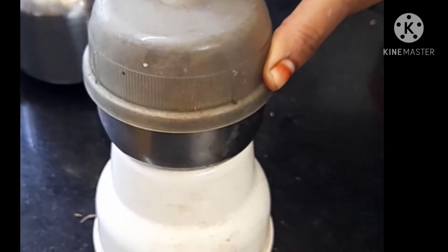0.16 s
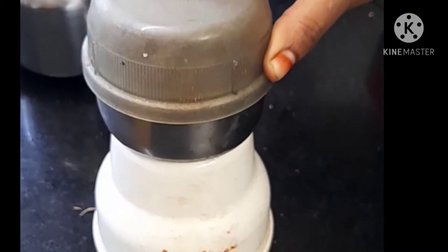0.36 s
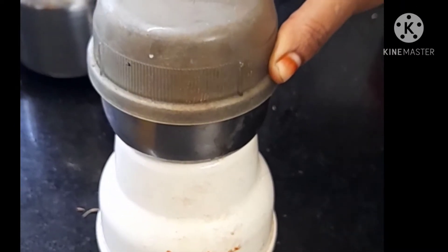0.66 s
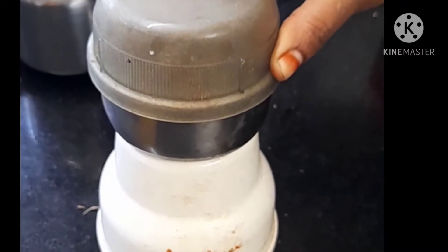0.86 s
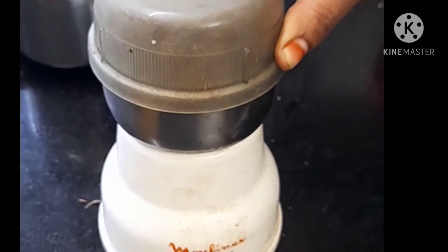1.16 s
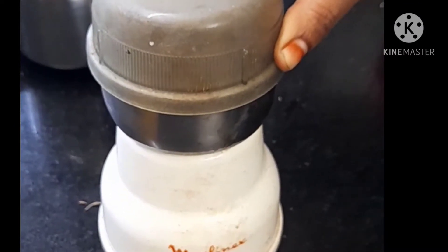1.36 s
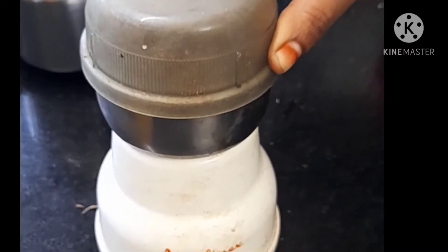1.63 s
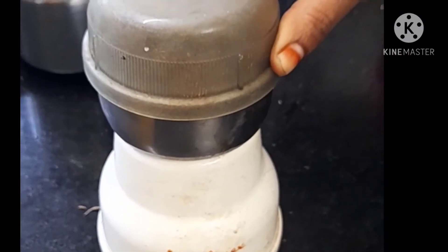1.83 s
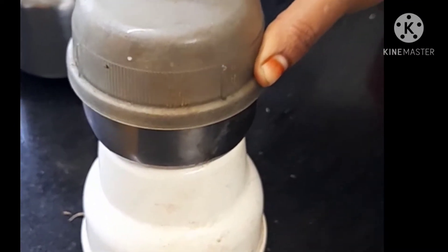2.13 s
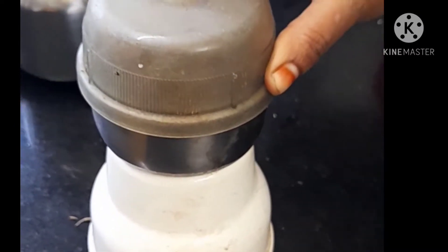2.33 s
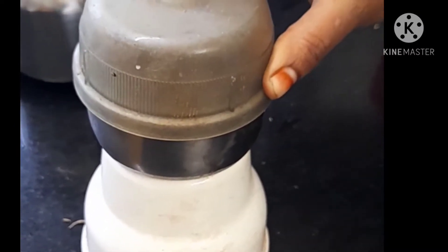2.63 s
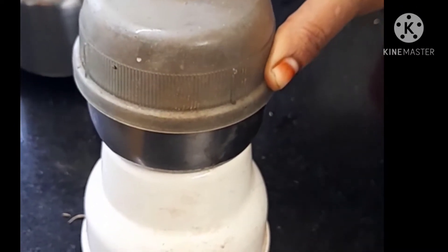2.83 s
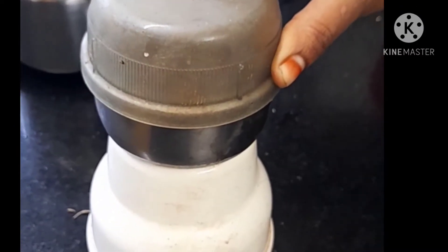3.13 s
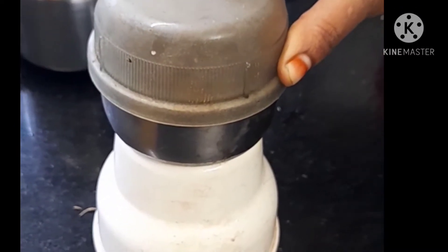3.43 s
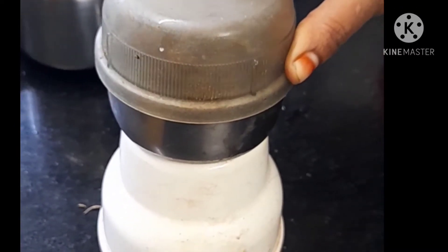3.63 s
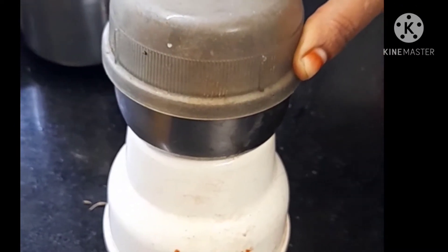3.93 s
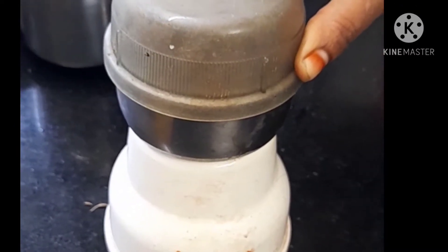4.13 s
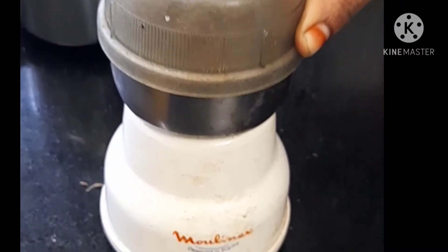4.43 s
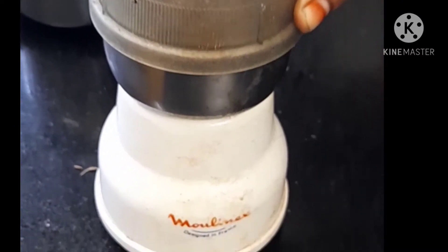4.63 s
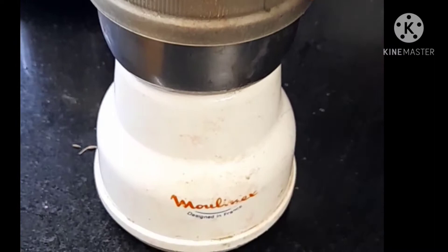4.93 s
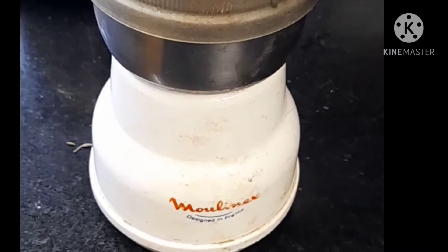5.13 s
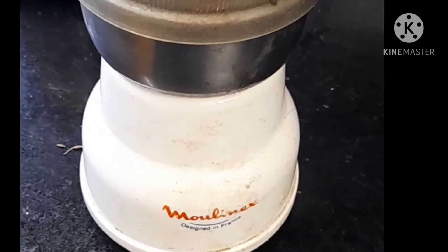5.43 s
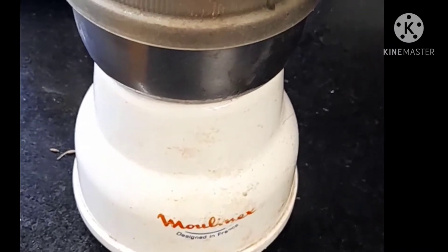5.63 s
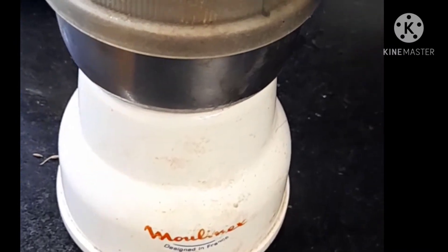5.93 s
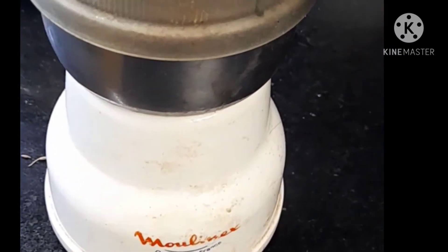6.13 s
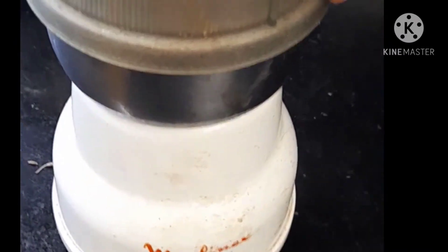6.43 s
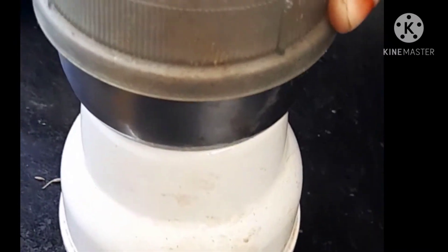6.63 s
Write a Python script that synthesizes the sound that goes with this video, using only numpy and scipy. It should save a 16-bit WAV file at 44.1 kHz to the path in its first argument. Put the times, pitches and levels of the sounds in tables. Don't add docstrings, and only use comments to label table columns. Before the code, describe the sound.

A small electric blade grinder runs very close to a stereo phone microphone on a kitchen counter. At 0 s it is already turning and climbs within about half a second to a steady whine, near 340 Hz with buzzing higher harmonics. Over it lies a rough, airy rush of blades through seeds, a hollow ring around 1 kHz and a bright, crackly hiss of fragments. Whole seeds knock irregularly on the cup, notably near 1.1, 2.0, 2.2 and 4.6 s. At about 2.3 s the switch is released; the whine slides down and the grinding thins by 2.8 s. At 2.9 s it revs again and grinds steadily, slightly higher, until 6.1 s, then coasts downward, the noise fading while loose pieces still rattle until the cut near 6.8 s. Low, dull air thumps hit mostly the left side throughout.

```python
import sys
import numpy as np
from scipy import signal
from scipy.fft import rfft, irfft, next_fast_len
from scipy.io import wavfile
from scipy.ndimage import uniform_filter1d, minimum_filter1d

SR = 44100
rng = np.random.default_rng(int(sys.argv[2]) if len(sys.argv) > 2 else 0)


def generate_wav(sig):
    pcm = np.round(np.clip(np.atleast_2d(sig).T, -1, 1) * 32767).astype(np.int16)
    wavfile.write(sys.argv[1], SR, pcm)


def level_to_linear(level):
    exponent = np.asarray(level, float) / 20
    return 10 ** exponent


N = 298983
SECONDS = np.arange(N) / SR
FFT_SIZE = next_fast_len(N)

# time in seconds, peak in dB.
PUFFS = [(0.075, -19), (0.103, -18), (0.228, -14), (0.292, -16.5), (0.52, -19), (0.58, -26), (0.701, -18.5),
         (1.054, -19), (1.084, -10), (1.421, -20.5), (1.762, -18.5), (2.476, -27), (2.51, -19),
         (3.394, -23), (3.734, -19), (3.826, -17.5), (3.906, -19), (4.21, -19), (4.362, -19.5),
         (4.434, -23), (4.583, -15.5), (4.661, -17.5), (4.853, -18), (5.267, -17), (5.544, -18),
         (5.704, -25), (5.84, -26), (5.938, -15), (6.064, -24), (6.421, -17.5),
         (0.005, -29), (0.743, -25), (0.886, -29), (0.999, -31), (1.278, -31), (1.482, -29),
            (1.524, -27), (1.785, -26), (1.903, -28), (2.105, -30), (2.187, -28), (2.641, -32),
            (2.369, -25), (3.277, -26), (3.637, -27), (3.76, -29), (3.866, -26), (3.983, -27), (4.131, -28),
            (5.065, -31), (5.164, -25), (5.228, -28), (5.344, -29), (5.455, -30), (5.509, -18.5),
            (6.131, -31), (6.16, -27), (6.265, -28), (6.37, -27), (6.633, -26)]

# time in seconds, peak in dB.
KNOCKS = [(0.1012, -16.5), (0.5035, -27), (0.617, -18), (0.9802, -30), (1.0775, -14), (1.2356, -18),
          (1.2815, -40), (1.411, -21), (1.5015, -20), (2.0282, -12.5), (2.173, -10), (2.5913, -16),
          (2.6393, -17.5), (2.75, -21), (2.9896, -16.5), (3.0164, -19), (3.3931, -13.5), (3.5527, -25),
          (3.7651, -32), (4.403, -18), (4.4834, -21), (4.582, -9.5), (4.8214, -19), (5.1971, -14.5),
          (5.5069, -14.5), (5.808, -24), (6.2077, -20), (6.3707, -15.5), (6.4435, -18.5), (6.621, -17)]
# pitch in Hz, width in Hz, level in dB.
CUP_WALL = [(1010, 180, -12), (2050, 260, -33), (3300, 740, -8), (5660, 1500, -25), (10170, 3400, -0.5),
            (14300, 1800, 1)]
BOUNCE_S, BOUNCE_DB = 0.015, -6.5

# frequency in Hz, level in dB.
RUSH = [(120, -90), (250, -9), (400, -11), (490, -13.5), (620, -56), (800, -1.5), (1350, -2), (2000, 2.5),
        (2500, -1), (3000, 1), (3700, -3), (4500, -14.5)]
# frequency in Hz, level in dB.
CUP_AIR = [(450, -16.5), (600, -12.5), (700, -12.5), (820, -9.5), (920, -0.5), (1010, -6.5), (1120, 0),
           (1200, -2.5), (1290, -25), (1420, -5.5), (1600, -25.5)]
# frequency in Hz, level in dB.
GRIT = [(2800, -22), (3600, -4), (4300, -0.5), (6300, 2), (7200, -1.5), (8200, -11), (9200, -34)]
# frequency in Hz, level in dB.
FIZZ = [(7300, -21), (8800, -7.5), (10200, -4), (11500, -2), (12600, -2.5), (13300, -1.5), (14200, -47)]
# frequency in Hz, level in dB.
SIZZLE = [(13100, -22), (13400, -4), (13600, 1), (13900, -2), (14300, -2), (14650, 0), (15000, -3),
          (15500, -2)]
# frequency in Hz, likeness from 0 to 1.
LIKENESS = [(200, .3), (400, 0.35), (1200, 0.19), (2400, 0.05), (4000, 0.02)]
# frequency in Hz, left over right in dB.
LEAN = [(200, 6), (500, 1.5), (1100, -0.5), (2200, -3), (4000, 0), (8000, -1), (11000, 2.5), (14000, -5.5)]
# time in seconds, bite of the blade in dB, whirl of fragments in dB.
CHURN = [(0.0, 0.5, -1.5), (0.13, -5, 3), (0.22, -5.5, 1), (0.5, 0.8, 0.9), (1.05, -1, 1.2), (1.55, -2, -1),
         (2.05, 0.9, 1.5), (2.45, -0.5, 4), (2.75, -8.5, -1.5), (2.84, -17, -3), (2.93, -5, 1),
         (3.3, -2, 1), (4.05, 3, -2), (4.6, -0.5, 0), (5.06, 1.5, 1), (6.1, 1, -1), (6.42, -8.5, -1),
         (6.7, -19, -5.5)]
# time in seconds, swell in dB.
SURGES = [(0.11, 1), (0.65, 4), (0.74, 2.5), (0.86, 4), (1.079, 6.5), (1.27, 0.5), (1.5, 0.5), (1.69, 3.5),
          (1.875, 3.5), (1.905, -0.5), (2.015, 3), (2.045, 5), (2.105, 1), (2.45, 2.5), (2.68, 4),
          (2.755, 8.5), (3.41, 0), (3.77, 5), (4.05, 4), (4.62, 3), (4.7, 5), (5.2, -2), (5.8, 4.5),
          (6.37, 1.5), (6.45, 3), (6.52, 2), (6.63, 8.5)]
SURGE_RISE_S, SURGE_FALL_S = 0.004, 0.028
# base in dB, share of bite, share of whirl, share of surges,
# dB per decade of speed, dB per second as the seeds wear down.
LAYERS = [
    (-34.5, 0.87, 0.086, 0.89, 1.8, 0.17),
    (-32.5, 0.11, 0.66, 1, 2.5, 0.16),
    (-36, 0.53, 0.38, 0.36, -14, -0.42),
]

# start in seconds, end in seconds, drag of the seeds afterwards in Hz.
POWER_ON = [
    (0, 2.325, 340.3),
    (2.89, 6.135, 263.3),
]
RIPPLE_HZ, RIPPLE_DB = 100, -2
START_HZ, SPIN_UP_S = 183.57, 0.15
COAST_S = 1.3
FULL_HZ = 343
# time in seconds, free speed in Hz, unbalance in dB,
# blade beat (order 3) in dB, cup shake (order 4) in dB.
LOAD = [(0.22, 335.7, -5, -36.5, -54), (0.5, 335.9, 2.5, -35.5, -53), (1.24, 343.1, -1.5, -30, -42),
        (1.56, 343.7, -1, -30.5, -52), (2.26, 342, -1.5, -32, -41.5), (2.76, 339, 7, -42, -49),
        (3.15, 337, -2.5, -30.5, -54), (3.185, 337.6, 5, -34.5, -48), (3.45, 340.1, 3.3, -36.5, -57),
        (4.0, 341, -3, -30.5, -45), (4.2, 344.3, -0.5, -26, -49.5), (4.8, 345.4, 0.5, -30, -42),
        (5.0, 345.2, 2.5, -30.5, -35), (5.25, 347.7, -0.6, -37.5, -36.5), (5.95, 346.6, -0.3, -38, -36.5),
        (6.1, 347.2, -3.5, -38, -45), (6.18, 345.3, 4.5, -31, -34), (6.28, 350.3, 2.5, -37, -38)]
# shaft speed in Hz, order 1 in dB.
HOUSING = [(105, -62), (128, -70.5), (152, -42.5), (180, -51.5), (255, -40), (298, -34), (325, -33),
           (345, -28)]
# order, left over right in dB, lead of the left in radians.
MAIN_ORDERS = [(1, -3.5, 0.77), (2, -2.5, 0.75), (3, -4, 0.073), (4, -4, 1.14), (6, -8, 1.76)]
# order, level over order 6 in dB, left over right in dB,
# lead of the left in radians.
WEAK_ORDERS = [(5, -1.5, 2.5, 5), (7, 2, -2, 2.5), (8, -7.5, 3.5, 2.1), (9, -5.5, -13, 3.5)]
# order, lower line in dB, upper line in dB,
# left over right of the upper line in dB.
SIDE_LINES = [(1, -93, -61.5, 24.5), (2, -49.5, -77, 15), (3, -45.5, -36, -8), (4, -41, -46.5, -14.5),
              (5, -67, -70, 7), (6, -47, -57, 7), (7, -49, -50.5, -14), (8, -46, -58.5, -19),
              (9, -41, -50.5, 8)]
OCTAVE_DB, OCTAVE_FOLLOWS = -43, 0.92
SIXTH_DB, SIXTH_FOLLOWS = -42.5, 0.75
SIXTH_COASTING_DB = -4
GRIP_HZ, FADE_DB_PER_DECADE = 307, 106
ROCK_HZ, ROCK_WIDTH_HZ, ROCK_DB = 157.8, 5.8, 10.5

LOW_CUT_HZ = 74
# frequency in Hz, sag below the usual share in dB.
SPARSE = [(1500, -14), (2600, -6), (3500, -3), (4800, -3), (5800, -6), (7300, -3.4), (9400, -3),
          (10500, -4.5), (13000, -6)]
# frequency in Hz, gain in dB.
TOP_EDGE = [(15430, 0), (15500, -24), (15820, -30), (15870, -60)]


def rms_one(x):
    return x / np.sqrt(np.mean(x ** 2) + 1e-20)


def in_time(rows):
    s, *columns = np.transpose(rows)
    return [np.interp(SECONDS, s, c) for c in columns]


def at_hz(points):
    hz, value = np.transpose(points)
    bins_hz = np.arange(1, FFT_SIZE // 2 + 2) * SR / FFT_SIZE
    return np.interp(np.log(bins_hz), np.log(hz), value)


def drift(rate):
    r = np.exp(-80 * np.pi * rate / SR)
    slow = signal.lfilter([1], [1, -2 * r, r * r], rng.standard_normal(N // 40 + 2002))[2000:]
    return np.interp(np.arange(N) / 40, np.arange(len(slow)), rms_one(slow))


def resonate(x, hz, width_hz):
    r = np.exp(-np.pi * width_hz / SR)
    poles = [1, -2 * r * np.cos(2 * np.pi * hz / SR), r * r]
    return signal.lfilter((1 - r * r) / 2 * np.array([1, 0, -1]), poles, x)


def powered():
    held = sum((SECONDS >= on) & (SECONDS < off) for on, off, _ in POWER_ON)
    return uniform_filter1d(held.astype(float), size=600)


def shaft_hz():
    free_hz, speed, now_hz = in_time(LOAD)[0], np.zeros(N), START_HZ
    r = np.exp(-1 / (SPIN_UP_S * SR))
    ends = [on for on, *_ in POWER_ON[1:]] + [N / SR]
    for (on, off, drag_hz), end in zip(POWER_ON, ends):
        a, b, c = int(on * SR), int(off * SR), round(end * SR)
        speed[a:b] = signal.lfilter([1 - r], [1, -r], free_hz[a:b], zi=[r * now_hz])[0]
        coasting = np.exp(-np.arange(c - b) / SR / COAST_S)
        speed[b:c] = (speed[b - 1] + drag_hz) * coasting - drag_hz
        now_hz = speed[c - 1]
    return uniform_filter1d(np.maximum(speed, 60), size=400)


def vent_air():
    t = np.arange(2000) / SR
    s, peak_db = np.transpose(PUFFS)
    steep = np.clip((peak_db + 19) / 30, 0, 1)
    puffs = 0
    for rise_s, share in [(0.0018, 1 - steep), (0.000057, steep)]:
        front = 1 - np.exp(-t / rise_s) * (1 + t / rise_s)
        shape = -front * np.exp(-(t / 0.0098) ** 2)
        starts = np.zeros(N)
        starts[((s - rise_s) * SR).astype(int)] = share * level_to_linear(peak_db + 16)
        puffs = puffs + signal.fftconvolve(starts, shape)[:N]
    low_pass = signal.butter(2, 90, fs=SR, output="sos")
    draught = rms_one(signal.sosfilt(low_pass, rng.standard_normal((2, N))))
    draught *= level_to_linear(1.4 * drift(12.0)) * level_to_linear([[-40], [-60]])
    draught *= (shaft_hz() / FULL_HZ) ** 1.2
    return puffs * level_to_linear([[0], [-25]]) + draught


def knocks():
    s, peak_db = np.transpose(KNOCKS)
    colour_db = rng.normal(0, 4.3, (len(s), len(CUP_WALL)))
    crack, scatter = np.exp(-1 / (0.002 * SR)), np.exp(-1 / (0.014 * SR))
    out = np.zeros((2, N))
    for (hz, width_hz, level_db), own_db in zip(CUP_WALL, colour_db.T):
        hits = np.zeros(N)
        hits[(s * SR).astype(int)] = level_to_linear(peak_db + level_db + own_db - 3.5)
        hits[((s + BOUNCE_S) * SR).astype(int)] = level_to_linear(peak_db + level_db - own_db - 2.5 + BOUNCE_DB)
        hits += 1e-18
        shape = signal.lfilter([1], [1, -crack], hits)
        shape += 0.96 * signal.lfilter([1], [1, -scatter], hits)
        splinters = np.clip(rng.standard_normal((2, N)), -1.6, 1.6)
        out += resonate(shape * splinters, hz, width_hz)
    return out * level_to_linear([[0.6], [-0.6]])


def coloured(x, spectrum):
    one, other = rfft(x, FFT_SIZE) * level_to_linear(at_hz(spectrum))
    turn = np.arcsin(np.clip(at_hz(LIKENESS), 0, 1)) / 2
    left = (np.cos(turn) * one + np.sin(turn) * other) * level_to_linear(at_hz(LEAN) / 2)
    right = (np.sin(turn) * one + np.cos(turn) * other) * level_to_linear(-at_hz(LEAN) / 2)
    return rms_one(irfft(np.array([left, right]), FFT_SIZE)[:, :N])


def grains(per_s, spread_db, burst_s, bed):
    sizes = level_to_linear(spread_db * np.minimum(rng.exponential(1, N), 5))
    sizes *= rng.random(N) < per_s / SR
    r = np.exp(-1 / (burst_s * SR))
    return np.sqrt(bed + rms_one(signal.lfilter([1], [1, -r], sizes)) ** 2)


def layer_levels():
    bite_db, whirl_db = in_time(CHURN)
    surge_db = 0
    for s, swell_db in SURGES:
        late = SECONDS - s
        swell = np.exp(np.minimum(late / SURGE_RISE_S, -late / SURGE_FALL_S))
        surge_db = surge_db + swell_db * swell
    decades = np.log10(shaft_hz() / FULL_HZ)
    levels = []
    for base_db, bites, whirls, surges, per_decade, wear in LAYERS:
        cup_db = bites * bite_db + whirls * whirl_db + surges * surge_db
        levels.append(base_db + cup_db + per_decade * decades + wear * (SECONDS - 3.4))
    return levels


def grinding():
    rush_db, fizz_db, ring_db = layer_levels()
    grit_db = 0.45 * rush_db + 0.55 * fizz_db - 1.5
    sizzle_db = fizz_db + 7.5 + 5.3 * np.log10(shaft_hz() / FULL_HZ)
    rattle = grains(per_s=250, spread_db=6.0, burst_s=0.012, bed=1.94)
    throb = 1 + 0.05 * powered() * np.sin(2 * np.pi * RIPPLE_HZ * SECONDS)
    white = rng.standard_normal((5, 2, N))
    rush = level_to_linear(rush_db + 3.5 + 2.23 * drift(12.5)) * coloured(white[0] * throb * rattle ** 0.52, RUSH)
    ring = level_to_linear(ring_db + 2.4 * drift(4.8)) * coloured(white[1] * throb * rattle ** 0.49, CUP_AIR)
    grit = level_to_linear(grit_db + 3 + 1.4 * drift(20.0)) * coloured(white[2] * throb ** 0.5 * rattle ** 0.56, GRIT)
    fizz = level_to_linear(fizz_db + 0.97 * drift(8.3)) * coloured(white[3] * rattle, FIZZ)
    sizzle = level_to_linear(sizzle_db + 2.0 * drift(12.0)) * coloured(white[4] * rattle ** 1.1, SIZZLE)
    return rush + ring + grit + fizz + sizzle


def line(phase, level_db, pan_db, lead):
    left = level_to_linear(pan_db / 2 + 0.5 * drift(4.2)) * np.sin(phase + lead)
    right = level_to_linear(-pan_db / 2) * np.sin(phase)
    return np.sqrt(2) * level_to_linear(level_db) * np.array([left, right])


def order_levels(speed_hz):
    _, unbalance_db, beat_db, shake_db = in_time(LOAD)
    fade_db = FADE_DB_PER_DECADE * np.minimum(np.log10(speed_hz / GRIP_HZ), 0)
    swing_db = beat_db + 32
    first_db = np.interp(speed_hz, *np.transpose(HOUSING)) + unbalance_db
    second_db = OCTAVE_DB + OCTAVE_FOLLOWS * swing_db + 0.48 * fade_db
    sixth_db = SIXTH_DB + SIXTH_FOLLOWS * swing_db + 1.2 * fade_db
    sixth_db += SIXTH_COASTING_DB * (1 - powered())
    return [first_db, second_db, beat_db + fade_db, shake_db + 0.7 * fade_db, sixth_db]


def motor():
    speed_hz = shaft_hz()
    levels = order_levels(speed_hz)
    ripple_db = RIPPLE_DB + 2.0 * drift(2.3)
    angle = 2 * np.pi * np.cumsum(speed_hz + 0.5 * drift(15.6)) / SR
    ripple = 2 * np.pi * RIPPLE_HZ * SECONDS
    slack_db = -8.0 * np.clip(1 - speed_hz / 335, 0, 1)
    shake_db = 1.15 * drift(8.5)
    out = np.zeros((2, N))
    for (k, pan_db, lead), level_db in zip(MAIN_ORDERS, levels):
        flutter_db = shake_db + 1.12 * np.sqrt(k) * drift(17.0) + 2.7 * slack_db * np.abs(drift(15.0))
        out += line(k * angle, level_db + (k - 1) * slack_db + flutter_db + 1.0, pan_db, lead)
    for k, over_db, pan_db, lead in WEAK_ORDERS:
        flutter_db = 2.0 * drift(5.4) + 2.0 * drift(6.7)
        out += line(k * angle + k, levels[-1] + k * slack_db + over_db + flutter_db, pan_db, lead)
    spun_db = ripple_db + 45 * np.log10(speed_hz / FULL_HZ)
    held = powered()
    for k, lower_db, upper_db, pan_db in SIDE_LINES:
        out += held * line(k * angle - ripple, lower_db + spun_db + 2.1 * drift(10.0), 0, 0.91 * k)
        out += held * line(k * angle + ripple, upper_db + spun_db + 2.35 * drift(8.1), pan_db, 1.0)
    return out


def rocking(x):
    return x + level_to_linear(ROCK_DB) * resonate(x, ROCK_HZ, ROCK_WIDTH_HZ)


def scene():
    return vent_air() + knocks() + grinding() + rocking(motor())


def drop_thin_bands(x):
    mid_side = np.array([x[0] + x[1], x[0] - x[1]]) / 2
    hz, _, frames = signal.stft(mid_side, SR, window="cosine", nperseg=2048)
    power = np.abs(frames[:, :1024]) ** 2
    band_db = 10 * np.log10(power.reshape(2, 128, 8, -1).mean(axis=2) + 1e-20)
    share_db = band_db - band_db[:, 8:88].mean(axis=1, keepdims=True)
    sag_db = share_db - share_db.mean(axis=2, keepdims=True)
    sag_db -= 0.6 * uniform_filter1d(sag_db, size=9, axis=1)
    line_hz, line_db = np.transpose(SPARSE)
    kept = sag_db > np.interp(hz[4::8], line_hz, line_db, left=-99)[:, None]
    kept = minimum_filter1d(kept, size=2, axis=2)
    frames[:, :1024] *= np.repeat(kept, 8, axis=1)
    mid, side = signal.istft(frames, SR, window="cosine", nperseg=2048)[1][:, :N]
    return np.array([mid + side, mid - side])


def roll_off(x):
    return signal.sosfilt(signal.butter(12, 16680, fs=SR, output="sos"), x)


def record(dry):
    x = signal.sosfilt(signal.butter(4, LOW_CUT_HZ, "high", fs=SR, output="sos"), dry)
    loudness = uniform_filter1d(np.abs(dry).max(axis=0), size=200)
    over_db = np.maximum(20 * np.log10(loudness + 1e-9) + 15.6, 0)
    held_db = np.maximum.accumulate(over_db + 150 * SECONDS) - 150 * SECONDS
    x = x * level_to_linear(-0.3 * uniform_filter1d(held_db, size=300))
    x = 0.6 * np.tanh(x / 0.6)
    x = drop_thin_bands(x)
    x = irfft(rfft(x, FFT_SIZE) * level_to_linear(at_hz(TOP_EDGE)), FFT_SIZE)[:, :N]
    return roll_off(x)


dry = scene()
out = record(dry)
generate_wav(out)
```